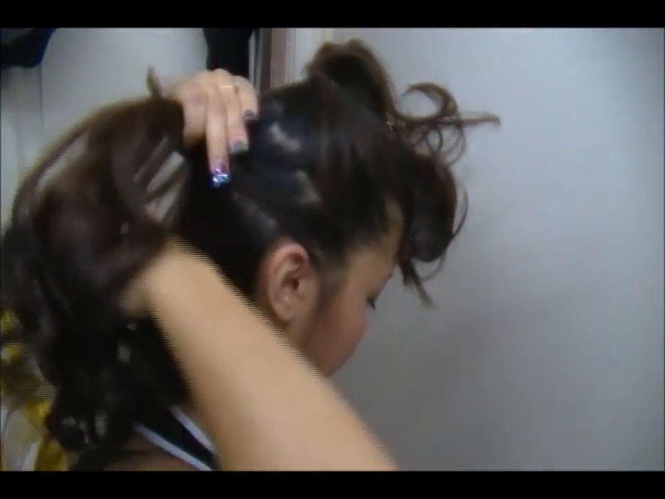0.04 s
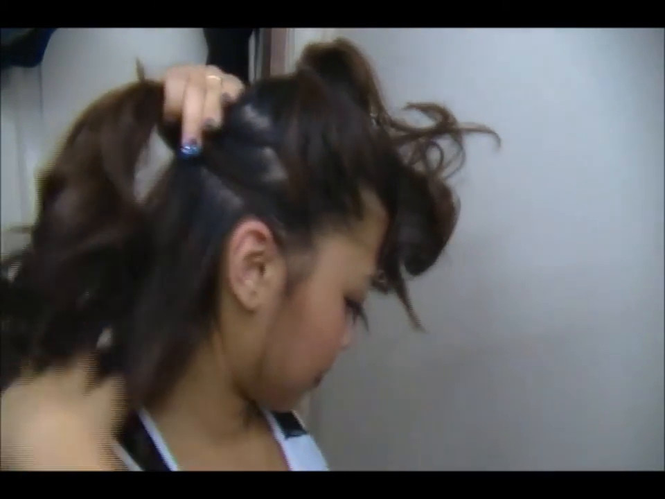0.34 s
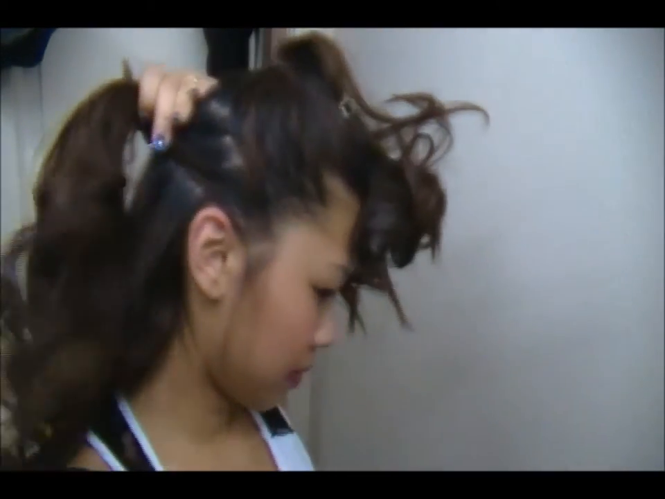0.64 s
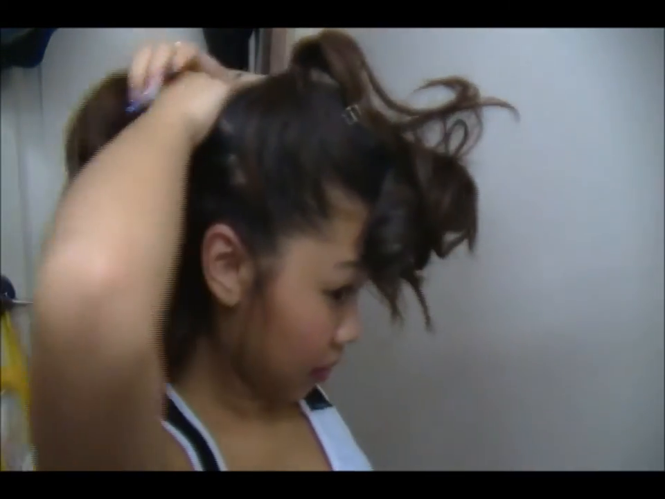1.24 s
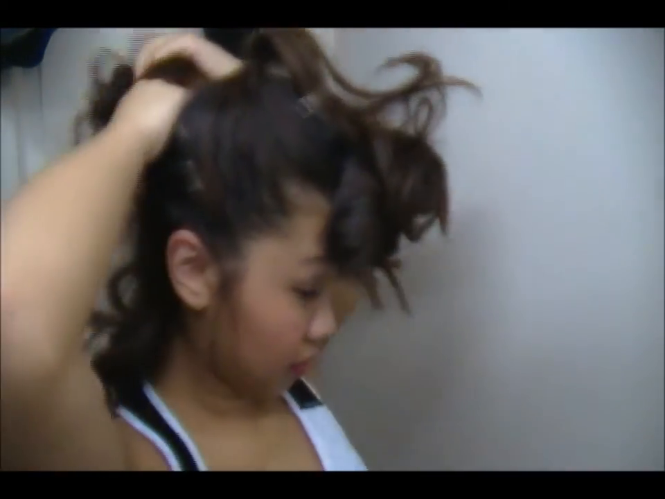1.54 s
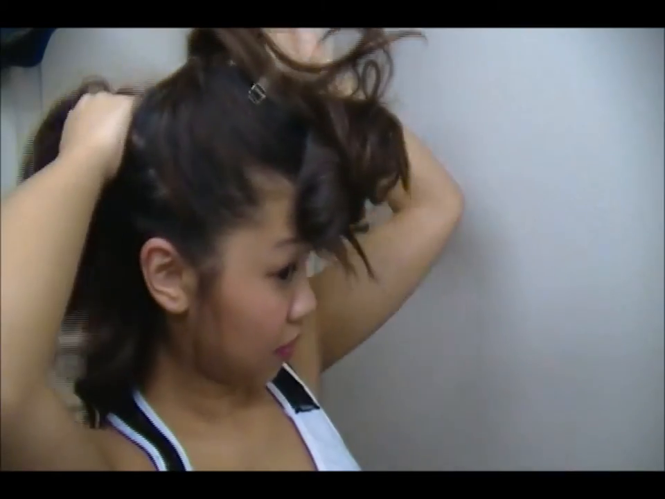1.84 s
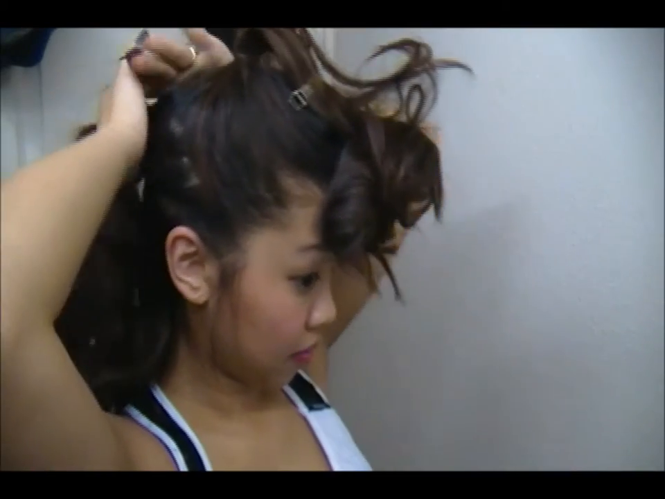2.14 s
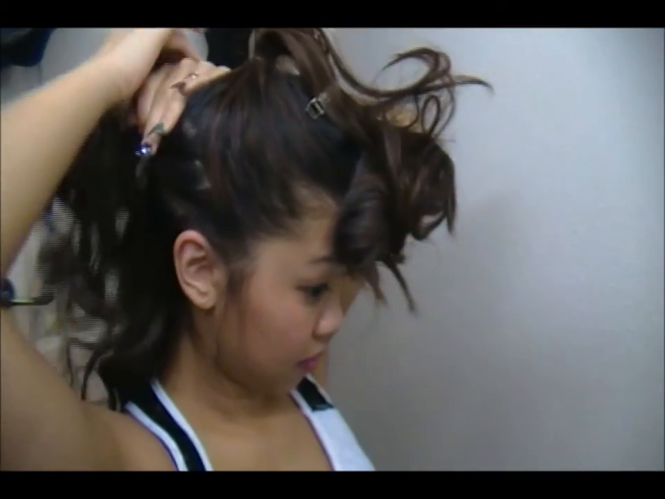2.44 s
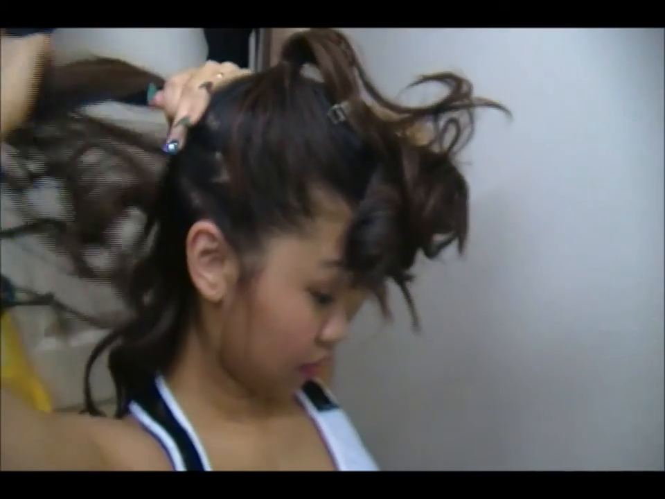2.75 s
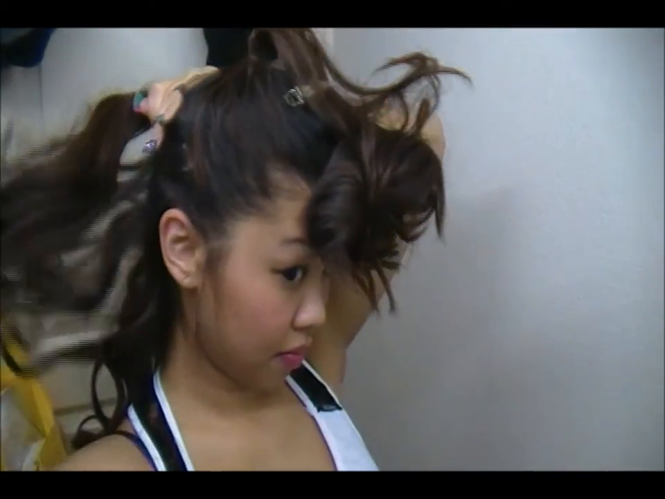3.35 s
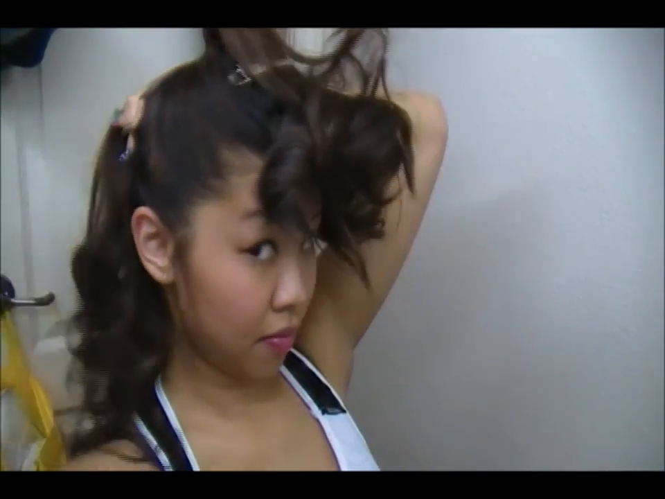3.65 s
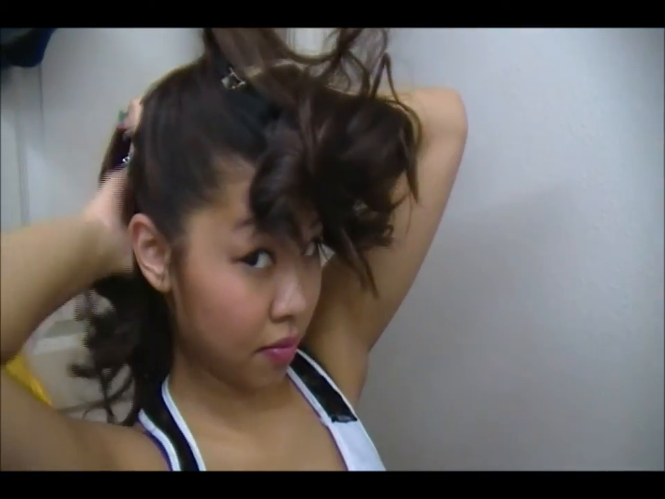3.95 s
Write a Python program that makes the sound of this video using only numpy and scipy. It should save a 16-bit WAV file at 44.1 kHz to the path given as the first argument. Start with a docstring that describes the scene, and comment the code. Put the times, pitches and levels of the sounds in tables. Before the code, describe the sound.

Two hair clip clicks, then quick swishes and soft hair rustle over a low hum.

```python
"""Long hair is gathered by hand in a small hard-walled room, near a hissy camera microphone.
From the start a motor throbs, the mains hum and fingers rustle faintly as hair slips over hair.
An arm brushes dully, a nail ticks, and a hair clip clicks twice, its impacts ringing its modes.
A hand then sweeps through the hair in two quick swishes of friction noise.
After that the fingers rustle on, with a few soft ticks, over the steady hum and hiss."""
import sys
import numpy as np
from scipy import signal
from scipy.fft import rfft, irfft
from scipy.io import wavfile

SR = 44100
rng = np.random.default_rng(int(sys.argv[2]) if len(sys.argv) > 2 else 0)


def file_out(sig):
    """Save sig as 16-bit WAV at sys.argv[1]."""
    # one column per channel
    cols = np.atleast_2d(sig).T
    # limit, then scale
    lim = np.clip(cols, -1, 1)
    pcm = np.round(lim * 32767).astype(np.int16)
    wavfile.write(sys.argv[1], SR, pcm)


N = 176400
TIME = np.arange(N) / SR

# stereo width of the room's sound field: (frequency [Hz], side relative to mid [dB])
ROOM_SIDE = [(200, -13), (1200, -16.5), (2400, -10), (4400, -5), (8000, -1.5), (15000, -7)]


def from_db(db):
    """Amplitude ratio: tenfold for every 20 dB."""
    return 10 ** (np.asarray(db) / 20)


def rms_one(x):
    """Normalisation to unit mean power."""
    return x / np.sqrt(np.mean(x ** 2) + 1e-20)


def pan(db):
    """Level-difference panning: gains that put the left channel db above the right."""
    return from_db([[db / 2], [-db / 2]])


def bins(x):
    """Frequencies of the Fourier transform, no lower than 1 Hz."""
    return np.maximum(np.fft.rfftfreq(x.shape[-1], 1 / SR), 1)


def colour(x, points):
    """Minimum-phase equaliser through points of (frequency [Hz], gain [dB])."""
    hz, db = np.transpose(points)
    size = x.shape[-1]
    gain = from_db(np.interp(np.log(bins(x)), np.log(hz), db))
    cepstrum = irfft(np.log(gain), size)
    cepstrum[1:size // 2] *= 2  # folding onto positive time makes the filter causal
    cepstrum[size // 2 + 1:] = 0
    return irfft(rfft(x) * np.exp(rfft(cepstrum)), size)


def stereo_noise(width):
    """Partly coherent noise: an independent side signal decorrelates the two channels."""
    mid, side = rng.standard_normal((2, N))
    return mid + colour(side, width) * [[1], [-1]]


def resonance(x, hz, width_hz):
    """Damped resonator: a two-pole band-pass whose bandwidth sets its decay."""
    radius = np.exp(-np.pi * width_hz / SR)
    feedforward = np.array([1, 0, -1]) * (1 - radius ** 2) / 2
    feedback = [1, -2 * radius * np.cos(2 * np.pi * hz / SR), radius ** 2]
    return signal.lfilter(feedforward, feedback, x + 1e-18)


def impulse(at):
    """Ideal impact: a unit impulse, flat in spectrum."""
    return 1. * (np.arange(N) == int(at * SR))


def swell(peak, rise, fall):
    """Exponential growth and decay about a peak, with time constants rise and fall."""
    return np.exp(-np.minimum(np.maximum((peak - TIME) / rise, (TIME - peak) / fall), 20))


def background():
    """Periodic sources give spectral lines; random ones give narrow-band whirs and broadband hiss."""
    # motor, mains and electronic whine tones: (frequency [Hz], level [dB])
    tones = [(16.7, -32), (58.3, -40.5), (103, -58.5), (120, -46.5), (291, -63.5), (360, -58.5), (404, -67),
             (1339, -74), (7853, -75), (7882, -70), (14675, -105)]
    # bands of motor noise and electronic whine: (centre [Hz], resonator bandwidth [Hz], level [dB])
    bands = [(114.3, 18.5, -52.5), (302.4, 23.6, -59.5), (359.6, 38, -60), (408.6, 18, -65),
             (491, 29, -65.5), (600, 49, -62), (987, 80, -65), (1338, 18, -71.5), (1504, 10, -79.5),
             (1950, 180, -68), (3110, 140, -71.5), (7860, 110, -71)]
    # spectrum of room noise and microphone hiss: (frequency [Hz], relative level [dB])
    hiss_spectrum = [(12, 31), (30, 26.5), (60, 15.5), (140, 13.5), (220, 5), (500, 4.5), (800, 0.5),
                     (1200, -3.5), (2000, -5), (4000, -8.5), (8000, -9.5), (15000, -11)]
    # stereo width of that noise: (frequency [Hz], side relative to mid [dB])
    hiss_side = [(60, -9.5), (250, -9), (1000, -5.5), (2000, -2.5), (4000, -1.5), (8000, -1.5),
                 (15000, 0.5)]
    hum, whirs = 0, 0
    for hz, db in tones:
        hum += from_db(db) * np.sqrt(2) * np.sin(2 * np.pi * (hz * TIME + rng.random()))
    for hz, width, db in bands:
        band = resonance(rng.standard_normal(N), hz, width)
        whirs += from_db(db) * rms_one(resonance(band, hz, width))
    hiss = from_db(-41) * rms_one(colour(stereo_noise(hiss_side), hiss_spectrum))
    return (hum + whirs) * pan(db=1) + hiss * pan(db=-0.5)


def strands(slips_per_s=3500, spread_db=3.5):
    """Shot noise of friction: hair slips over hair in dense random impulses of uneven size."""
    sizes = from_db(spread_db * np.minimum(rng.exponential(1, N), 5))
    signs = rng.choice([-1, 1], N)
    return sizes * signs * (rng.random(N) < slips_per_s / SR)


def fingers():
    """Friction noise, slowly modulated in amplitude as the fingers gather the hair."""
    # envelope of the rustle: (time [s], level [dB])
    envelope = [(0, -55.5), (.25, -53), (.75, -52.5), (.9, -57.5), (1.05, -52), (1.47, -53.5),
                (1.65, -55.5), (2.0, -60.5), (2.35, -57), (2.42, -52.5), (2.5, -57.5), (2.72, -57.5),
                (2.9, -54.5), (3.05, -59.5), (3.4, -55), (3.52, -59), (4, -63)]
    # spectrum of rubbing hair: (frequency [Hz], relative level [dB])
    hair_spectrum = [(300, 1.5), (1200, 2.5), (3200, 0.5), (5500, -4), (10000, -7), (15000, -10)]
    level = from_db(np.interp(TIME, *np.transpose(envelope)))
    return level * rms_one(colour(strands(), hair_spectrum))


def arm():
    """Soft sliding friction: low-frequency noise swells with each movement of the arm."""
    # brushing movements: (peak time [s], level [dB], rise constant [s], fall constant [s])
    movements = [(.185, -44.5, 0.029, 0.16), (.58, -34, 0.053, 0.039), (.661, -35, 0.025, 0.013)]
    # spectrum of the rubbing: (frequency [Hz], relative level [dB])
    rub_spectrum = [(50, -6), (110, 3), (160, 4), (215, -7), (280, -14.5), (500, -8), (800, -11.5),
                    (1300, -20), (3000, -37)]
    level = sum(from_db(db) * swell(peak, rise, fall) for peak, db, rise, fall in movements)
    return level * rms_one(colour(stereo_noise(ROOM_SIDE), rub_spectrum))


def ticks():
    """Impulse responses: each small contact of nail or hair excites one heavily damped resonance."""
    # light contacts: (time [s], level [dB], centre [Hz], bandwidth [Hz])
    contacts = [(.245, -18.5, 2200, 1800), (1.518, -14, 4000, 4500), (2.272, -16.5, 3300, 180),
                (2.445, -20.5, 2690, 1200), (2.915, -19, 6000, 8000), (3.412, -18.5, 6000, 9000),
                (3.443, -19, 5000, 7000)]
    out = 0
    for at, db, hz, width in contacts:
        energy_gain = np.sqrt(SR / 2 / width) / 2  # makes energy independent of bandwidth
        out += from_db(db) * energy_gain * resonance(impulse(at), hz, width)
    return out


def hair_clip(snap_db=2, ring_db=-40):
    # impacts, in two clusters: (time [s], level [dB], contact low-pass [Hz], ring offset [dB])
    impacts = [(.284, -2, 1600, -5), (.289, -8.5, 2600, -5), (0.3959, 0, 6000, -2),
               (.3995, -5.5, 5000, -12), (0.4067, -4.5, 7000, 7.5)]
    clip_modes = [(667, -13, .16), (790, 0.5, 0.069), (1247, -11, .16), (2030, -4, .17), (3570, -2, .2),
                  (3700, -7, 0.12), (3920, -8, 0.12), (4670, -4, 0.22), (4713, -1, 0.18), (4720, -2, 0.082)]
    # equalisation of the snap: (frequency [Hz], gain [dB])
    snap_spectrum = [(100, -11), (300, -3), (700, 6.5), (1050, 0), (1500, 4), (2600, -1.5), (4200, 1),
                     (6500, -4), (10000, -9.5), (15000, -20)]
    snaps, rings = 0, 0
    for at, db, contact_hz, offset_db in impacts:
        pole = np.exp(-2 * np.pi * contact_hz / SR)  # a softer contact carries less treble
        pulse = signal.lfilter([1 - pole], [1, -pole], impulse(at) + 1e-18)
        snaps += from_db(db + snap_db) * pulse
        age = np.maximum(TIME - at, 0)
        for hz, mode_db, t60 in clip_modes:
            wave = np.sin(2 * np.pi * hz * age) * rng.choice([-1, 1])
            decay_db = 60 * np.minimum(age / t60, 3)
            rings += wave * from_db(db + ring_db + offset_db + mode_db - decay_db)
    return room(colour(snaps, snap_spectrum)) + rings * pan(db=3)


def swishes():
    """Band-limited friction noise swells and dies as the hand sweeps through the hair."""
    # overlapping bands of the two strokes:
    # (peak time [s], level [dB], rise constant [s], fall constant [s], centre [Hz], half-width [octaves])
    stroke_bands = [(.563, -33, .002, .015, 4400, 0.75), (.588, -39, .004, 0.0061, 3900, 1.7),
                    (0.559, -41.5, 0.087, 0.045, 1120, 1.4), (0.553, -50, .1, 0.088, 5800, 0.54),
                    (0.6646, -35.5, 0.013, 0.022, 2840, 0.85)]
    out = 0
    for peak, db, rise, fall, hz, octaves in stroke_bands:
        slips = strands()
        ratio = bins(slips) / hz
        band_pass = 1 / np.sqrt(1 + (np.log2(ratio) / octaves) ** 4)
        treble_tilt = 1 / np.sqrt(1 + ratio)
        friction = irfft(rfft(slips) * band_pass * treble_tilt, N)
        out += from_db(db) * rms_one(friction) * swell(peak, rise, fall)
    return out


def room(x, early_t60_s=0.076, late_t60_s=0.47, late_db=-12.5, direct_db=-15, length_s=0.4):
    """Reverberation by convolution: direct sound, dense near-wall reflections and a weaker long tail."""
    # treble loss of the reflections: (frequency [Hz], gain [dB])
    treble_loss = [(11000, -0.5), (15000, -4.5)]
    decay = from_db(-60 * TIME / early_t60_s) + from_db(late_db - 60 * TIME / late_t60_s)
    tail = colour(stereo_noise(ROOM_SIDE), treble_loss) * decay
    response = tail[:, :int(length_s * SR)] / np.sqrt(np.sum(tail ** 2) / 2)
    response[:, 0] += from_db(direct_db)
    return signal.fftconvolve(x[None], response, axes=1)[:, :N]


def scene():
    """Superposition: the handling sounds, panned slightly right, add to the steady background."""
    handling = hair_clip() + room(ticks() + swishes() + fingers()) + arm()
    return handling * pan(db=-1.2) + background()


def record(dry):
    """Band limiting: a steep linear-phase low-pass removes the highest treble."""
    cutoff_hz = 15050
    low_pass = signal.firwin(601, cutoff_hz, fs=SR, window="blackman")
    return signal.fftconvolve(dry, low_pass[None], "same", axes=1)


dry = scene()
out = record(dry)
file_out(out)
```